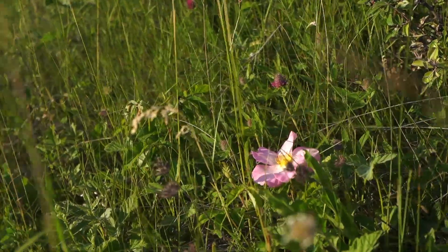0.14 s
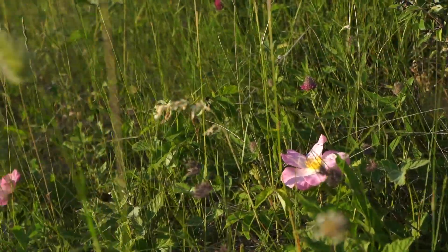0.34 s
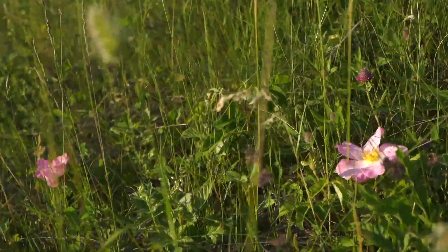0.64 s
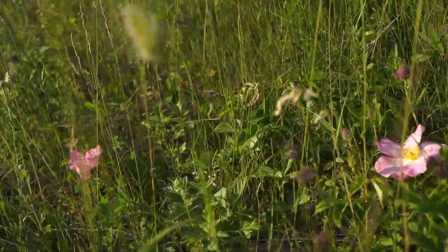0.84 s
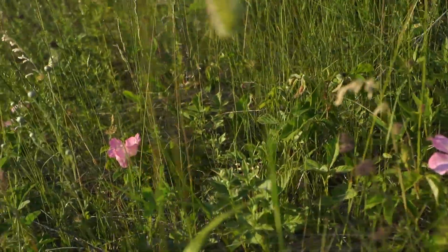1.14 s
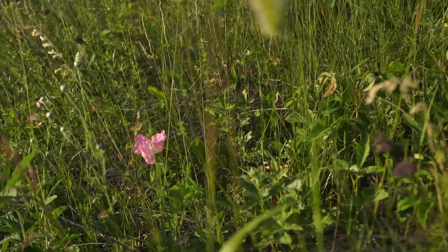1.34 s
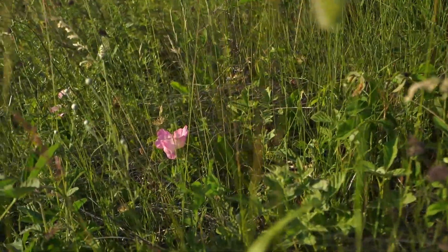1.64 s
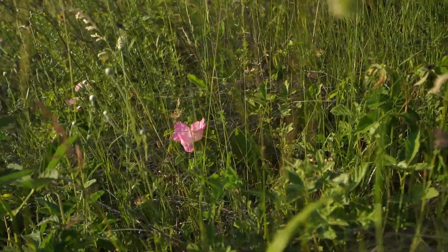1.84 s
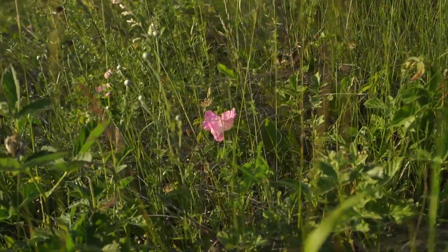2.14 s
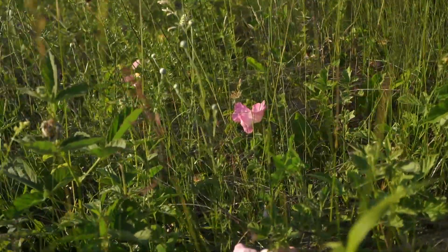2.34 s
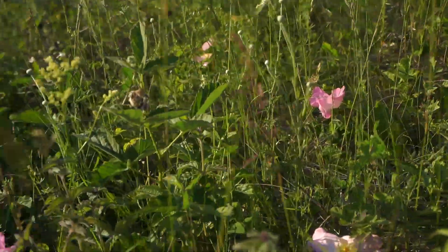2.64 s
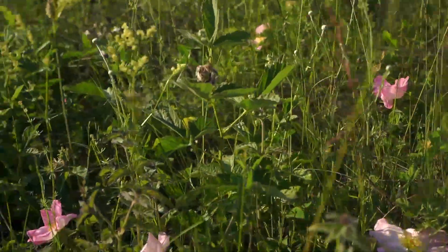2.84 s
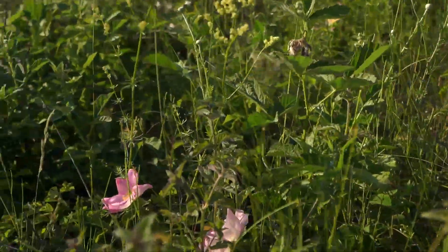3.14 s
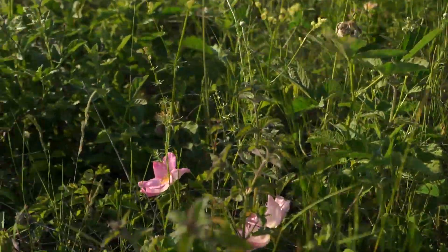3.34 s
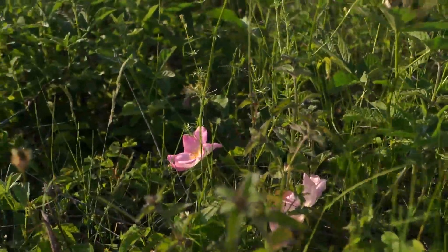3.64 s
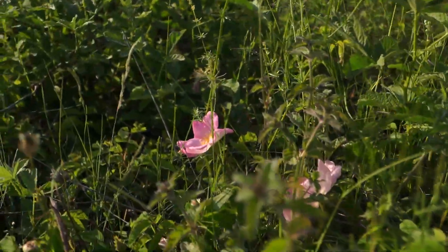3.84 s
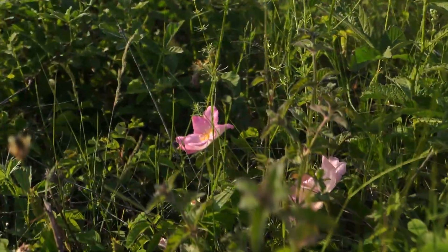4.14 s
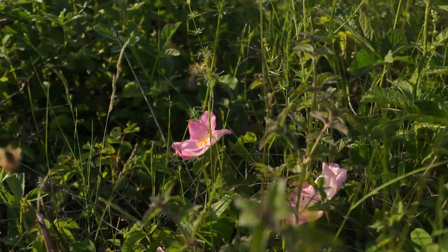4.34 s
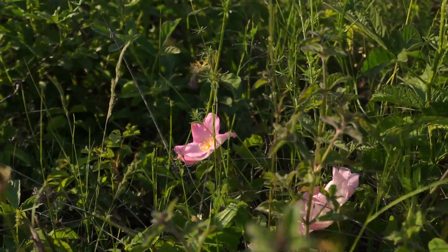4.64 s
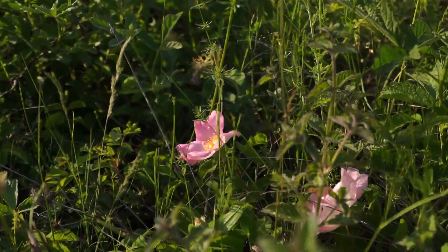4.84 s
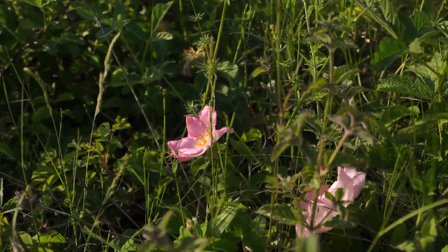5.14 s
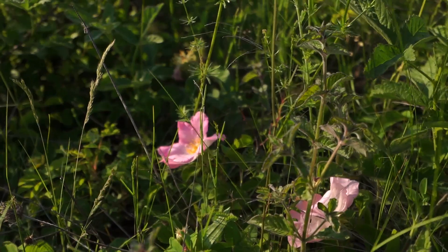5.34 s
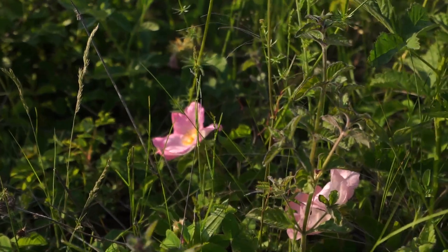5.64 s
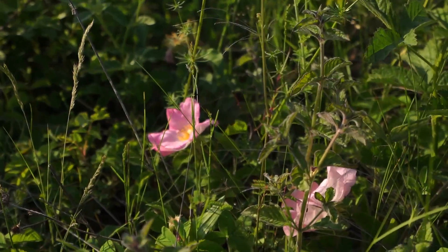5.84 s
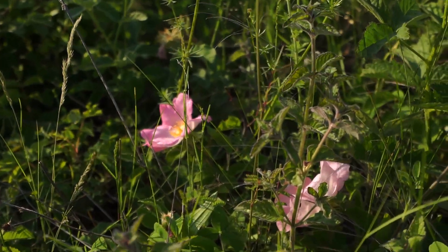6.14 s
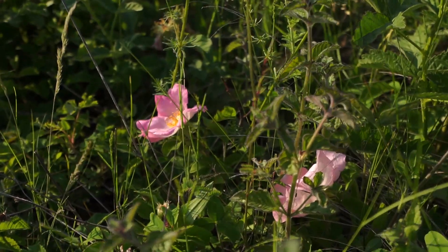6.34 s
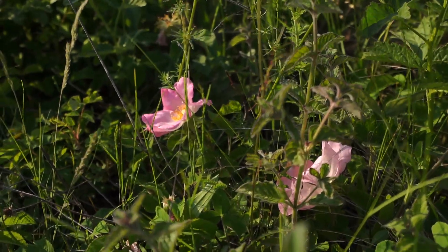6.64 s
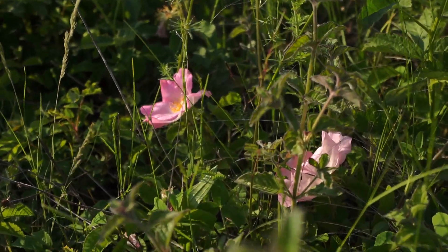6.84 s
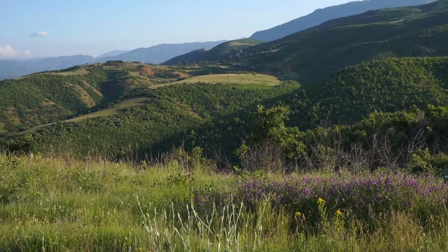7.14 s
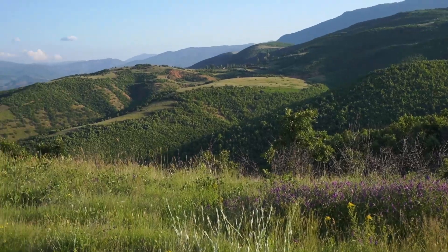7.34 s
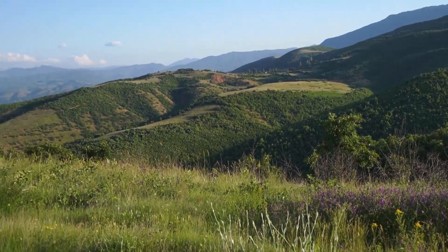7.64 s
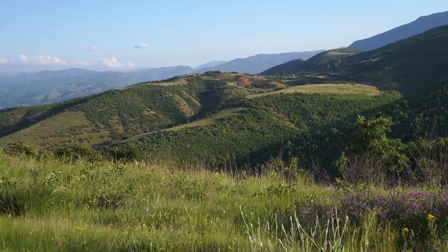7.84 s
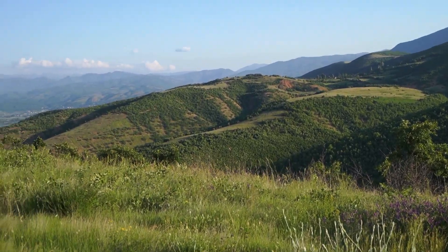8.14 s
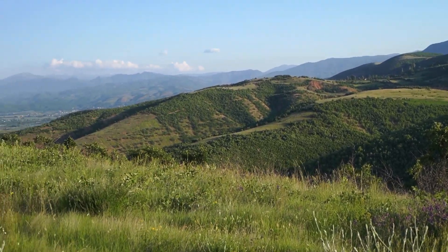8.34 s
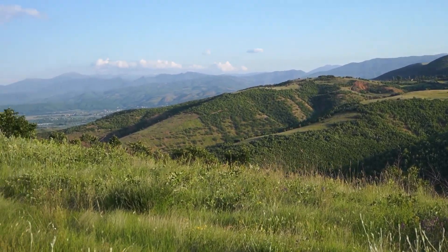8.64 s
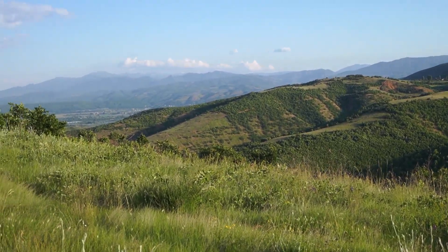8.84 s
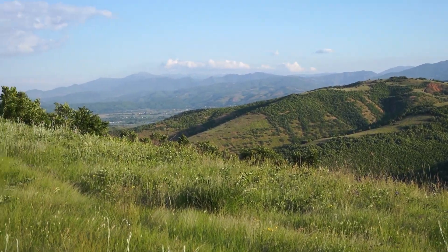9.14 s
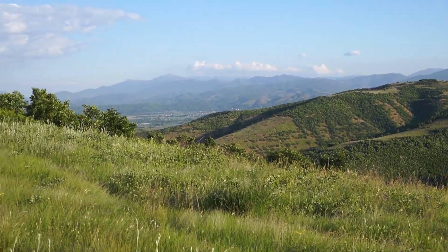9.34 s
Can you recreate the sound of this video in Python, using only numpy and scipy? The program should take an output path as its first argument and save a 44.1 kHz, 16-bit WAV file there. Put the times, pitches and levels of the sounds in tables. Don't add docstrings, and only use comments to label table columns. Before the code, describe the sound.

Several field crickets chirp in overlapping pulses over a faint distant chorus while gusts rumble on the microphone and a small bird sings near the end.

```python
import sys
import numpy as np
from scipy import signal
from scipy.fft import rfft, irfft
from scipy.io import wavfile
from scipy.ndimage import uniform_filter1d

SR = 44100
rng = np.random.default_rng(int(sys.argv[2]) if len(sys.argv) > 2 else 0)


def put_to_file(sound):
    columns = np.atleast_2d(sound).T
    safe = np.clip(columns, -1, 1)
    whole_steps = np.round(safe * 32767)
    wavfile.write(sys.argv[1], SR, whole_steps.astype(np.int16))


def convert_level_to_amplitude(level_db):
    exponent = np.asarray(level_db, float) / 20
    return 10 ** exponent


N = 418950

# f/Hz, level/dB, t60/s
HOUSING_MODES = [(141.4, 2.5, 0.13), (177.6, -13.5, 0.13), (250.7, -15.5, 0.11)]


def rms_one(x):
    return x / np.sqrt(np.mean(x ** 2) + 1e-20)


def drift(rate):
    r = np.exp(-80 * np.pi * rate / SR)
    white = rng.standard_normal(N // 40 + 2002)
    slow = signal.lfilter([1], [1, -2 * r, r * r], white)[2000:]
    return np.interp(np.arange(N) / 40, np.arange(len(slow)), rms_one(slow))


def shaped_noise(spectrum):
    hz, level_db = np.transpose(spectrum)
    grid = np.arange(N // 2 + 1) * SR / N + .01
    gain = convert_level_to_amplitude(np.interp(np.log(grid), np.log(hz), level_db))
    return rms_one(irfft(rfft(rng.standard_normal(N)) * gain, N))


def resonate(x, hz, width_hz):
    r = np.exp(-np.pi * width_hz / SR)
    poles = [1, -2 * r * np.cos(2 * np.pi * hz / SR), r * r]
    return signal.lfilter((1 - r * r) / 2 * np.array([1, 0, -1]), poles, x + 1e-18)


def narrow_noise(count, hz, width_hz):
    white = rng.standard_normal(count)
    return rms_one(resonate(resonate(white, hz, width_hz), hz, width_hz))


def ring(clicks, hz, t60):
    r, w = convert_level_to_amplitude(-60 / (t60 * SR)), 2 * np.pi * hz / SR
    return signal.lfilter([0, np.sin(w)], [1, -2 * r * np.cos(w), r * r], clicks + 1e-18)


def ring_modes(clicks, modes):
    return sum(convert_level_to_amplitude(db) * ring(clicks, hz, t60) for hz, db, t60 in modes)


def clicks_at(events):
    out = np.zeros(N)
    out[[round(s * SR) for s, db in events]] = convert_level_to_amplitude(np.array(events)[:, 1])
    return out


def add(out, start_s, sound):
    at = round(start_s * SR)
    out[at:at + len(sound)] += sound[:N - at]


def progress(start_s, end_s):
    return np.linspace(0, 1, round((end_s - start_s) * SR))


def bell(centre_s, half_s):
    return np.exp(-((np.arange(N) / SR - centre_s) / half_s) ** 2)


def tone(hz):
    return np.sin(2 * np.pi * np.cumsum(hz) / SR)


def grass_echo(x, t60):
    t = np.arange(round(t60 * SR)) / SR
    onset = np.minimum(t / .016, 1) ** 2
    tail = rng.standard_normal(len(t)) * convert_level_to_amplitude(-60 * t / t60) * onset
    return signal.fftconvolve(x, tail / np.sqrt(np.sum(tail ** 2)))[:N]


def gust_db():
    # t/s, level/dB, fall/(dB/s)
    gusts = [(.05, -19, 73), (.55, -32, 62), (.74, -33.5, 70), (2.91, -15.5, 47), (3.18, -17.5, 20),
             (3.41, -15.5, 103), (3.671, -10.5, 29), (4.1, -19, 60), (4.5, -23, 62), (4.72, -22, 32),
             (4.9, -18, 124), (5.06, -17, 200), (5.158, -12, 105), (5.34, -10, 110), (5.62, -20, 48),
             (5.95, -24, 24), (6.3, -23, 20), (6.5, -15.5, 250), (6.66, -16.5, 59), (7.14, -23.5, 130),
             (7.301, -14, 23), (7.48, -16, 37), (7.66, -18, 54), (7.94, -15.5, 25), (8.4, -19, 27),
             (8.71, -8, 108), (9.03, -12, 27), (9.16, -4.5, 78)]
    rise_db_per_s, lull_db = 111, -41
    t, level = np.arange(N) / SR, np.full(N, float(lull_db))
    for s, db, fall in gusts:
        level = np.maximum(level, db - np.where(t < s, rise_db_per_s * (s - t), fall * (t - s)))
    return level


def wind():
    # f/Hz, level/dB per Hz
    buffeting = [(2.9, -33), (5.0, -2), (16, 3.5), (30, -4.5), (89, -20), (227, -44.5), (262, -46.5),
                 (400, -58.5), (520, -80), (880, -120)]
    gust = gust_db()
    buffet = shaped_noise(buffeting) * convert_level_to_amplitude(gust + 1.83 * drift(12.7))
    shaken = sum(convert_level_to_amplitude(db) * ring(rng.standard_normal(N), hz, t60) for hz, db, t60 in HOUSING_MODES)
    hand_db, under_gust_db, follows_share = -47.5, -38.5, 0.63
    shaking = np.hypot(convert_level_to_amplitude(hand_db), convert_level_to_amplitude(under_gust_db + follows_share * gust))
    return 1.24 * np.tanh(buffet / 1.13) + rms_one(shaken) * shaking * convert_level_to_amplitude(2 * drift(9.4))


def air():
    # f/Hz, level/dB per Hz
    rustling = [(120, -36), (200, -5.5), (321, -9.5), (620, -5), (704, -9.5), (1110, -8.5), (1330, -11.5),
                (3440, -17.5), (4210, -17), (4870, -14), (6280, -20.5), (10100, -29), (15600, -34)]
    # t/s, half length/s, swell/dB
    brushing = (3.13, 0.84, 1.6)
    # t/s, half length/s, swell/dB
    far_swell = (6.62, 0.37, 3.2)
    # start t/s, end t/s, f/Hz, width/Hz, level/dB
    drone = (6.35, 6.9, 1680, 70, -65)
    # share of its f, level/dB
    buzz_bands = [(1, 3), (1.34, -8)]
    brush, swell = bell(*brushing[:2]), bell(*far_swell[:2])
    floor = convert_level_to_amplitude(-54 + brushing[2] * brush) * shaped_noise(rustling)
    low = signal.sosfilt(signal.butter(2, 2500, fs=SR, output="sos"), floor)
    crackles_per_s = 5.0 + 350 * brush
    born = rng.random(N) < crackles_per_s / SR
    crackle_db = -49.5 + 5.2 * np.minimum(rng.exponential(1, N), 4)
    crackle = resonate(born * convert_level_to_amplitude(crackle_db), 8500, 6000)
    out = convert_level_to_amplitude(far_swell[2] * swell) * low + floor - low + crackle
    start, end, hz, width, db = drone
    u = progress(start, end)
    for share, level_db in buzz_bands:
        band = rms_one(resonate(rng.standard_normal(len(u)), share * hz, width))
        add(out, start, convert_level_to_amplitude(db + level_db) * np.sin(np.pi * u) * band)
    return out


def chorus():
    # f/Hz, width/Hz, level/dB
    bands = [(4685, 160, -67), (5080, 300, -69)]
    return sum(convert_level_to_amplitude(db + 5.1 * drift(27) + drift(4.3)) * narrow_noise(N, hz, width) for hz, width, db in bands)


def strokes_of(chirps, opens):
    opener_lead_s, third_at_share, uneven_db = .030, .475, 1
    lifts_db = [-7, -0.4, 0, 0.4]
    uneven = uneven_db * rng.standard_normal((len(chirps), 4))
    strokes = []
    for (second, last, db), row in zip(chirps, uneven):
        times = [second - opener_lead_s, second, second + third_at_share * (last - second), last]
        chirp = [(s, db + lift_db + e) for s, lift_db, e in zip(times, lifts_db, row)]
        strokes += chirp if opens else chirp[1:]
    return strokes


def cricket(strokes, pitch_hz, lift, skip, second_db, third_db, click_db, echo_db):
    # share of f, length/s
    stroke_shapes = [(1.001, 0.0222), (.996, 0.01985), (.989, 0.0185), (.968, 0.0166)]
    out, scattered, left, later = np.zeros(N), np.zeros(N), 0, np.inf
    luck = rng.standard_normal((len(strokes), 3))
    for (s, db), (tune, stretch, wobble) in zip(strokes[::-1], luck):
        left = left + 1 if later - s < .055 else 0
        later = s
        share, length = stroke_shapes[min(left, 3)]
        u = progress(0, length * (1 - 3.5 * lift + 0.051 * stretch))
        since = u - skip * (1 + 0.22 * np.tanh(wobble))
        sag = 1 + lift * (since < 0) - 0.092 * u ** 3.01
        phase = 2 * np.pi * np.cumsum(pitch_hz * (share + 0.0033 * tune) * sag) / SR
        falter = 1 - 1.3 * skip * np.exp(-((since - .08) / 0.074) ** 2)
        body = np.sin(np.pi * u ** 0.94) ** 0.67 * falter * (1 + 0.04 * np.sin(14 * u + 2 * wobble))
        overtones = convert_level_to_amplitude(second_db) * np.sin(2 * phase) + convert_level_to_amplitude(third_db) * np.sin(3 * phase)
        hiss = np.diff(rng.standard_normal(len(u) + 1))
        burst = np.sin(1.13 * phase) + 0.32 * np.sin(2.4 * phase) + .05 * hiss
        click = convert_level_to_amplitude(click_db + 4.8 * stretch) * burst * np.exp(-(since / 0.051) ** 2)
        stroke = body * (np.sin(phase) + overtones) + click
        add(out, s - .001 - .008 * skip, convert_level_to_amplitude(db) * stroke)
        add(scattered, s, convert_level_to_amplitude(0.17 * (db + 44.5)) * stroke)
    return out + convert_level_to_amplitude(echo_db) * grass_echo(scattered, t60=0.17)


def crickets():
    # second stroke t/s, last stroke t/s, peak level/dB
    low = [(.191, .266, -38.5), (.556, .631, -40), (.859, .934, -38), (1.19, 1.266, -37),
           (1.51, 1.585, -38), (1.844, 1.919, -39.5), (2.148, 2.217, -40), (2.479, 2.556, -40),
           (2.788, 2.865, -41.5), (3.108, 3.187, -44), (3.45, 3.526, -45.5), (3.781, 3.858, -47),
           (4.115, 4.189, -45), (4.432, 4.508, -46), (4.819, 4.901, -44.5), (5.109, 5.183, -46.5),
           (5.432, 5.505, -42.5), (5.749, 5.822, -43.5), (6.077, 6.156, -44.5), (6.406, 6.479, -45),
           (6.723, 6.802, -45.5), (7.035, 7.108, -45), (7.313, 7.388, -35.5), (7.634, 7.707, -37),
           (7.961, 8.038, -40), (8.271, 8.351, -42), (8.591, 8.668, -43), (8.908, 8.981, -41.5),
           (9.216, 9.291, -43)]
    clear = [(0.331, 0.404, -36.5), (0.68, 0.756, -37), (1.071, 1.146, -36.5), (1.446, 1.515, -37),
             (1.802, 1.877, -36), (2.161, 2.237, -35.5), (2.508, 2.579, -39), (2.86, 2.936, -40.5),
             (3.259, 3.33, -42), (3.59, 3.665, -40.5), (3.945, 4.022, -39), (4.314, 4.389, -39),
             (4.676, 4.745, -42.5), (5.054, 5.125, -39.5), (5.407, 5.479, -41), (5.796, 5.87, -40),
             (6.204, 6.278, -41), (6.621, 6.698, -41.5), (6.987, 7.066, -39.5), (7.076, 7.153, -38),
             (7.493, 7.564, -36.5), (7.849, 7.913, -42.5), (8.185, 8.25, -46.5), (9.319, 9.389, -44)]
    sharp_start = [(.158, .225, -46), (.455, .52, -45.5), (.745, .812, -47.5), (.999, 1.062, -44.5)]
    sharp = [(1.566, 1.639, -45), (1.964, 2.034, -43.5), (2.307, 2.372, -45), (2.644, 2.714, -46.5),
             (2.976, 3.041, -46.5), (3.289, 3.356, -44), (3.598, 3.664, -43.5), (3.899, 3.968, -48.5),
             (4.213, 4.282, -44), (4.522, 4.588, -46), (4.812, 4.883, -48), (5.211, 5.279, -46.5),
             (5.493, 5.556, -46.5), (5.782, 5.849, -46), (6.061, 6.131, -47.5), (6.356, 6.421, -46.5),
             (6.673, 6.74, -48.5), (6.986, 7.047, -45.5), (7.343, 7.408, -44)]
    near = [(7.256, 7.321, -34), (7.587, 7.657, -33), (7.954, 8.021, -30.5), (8.292, 8.36, -29.5),
            (8.633, 8.699, -30), (8.938, 9.003, -31), (9.277, 9.344, -30.5)]
    far = [(8.40, 8.47, -56), (8.496, 8.561, -48), (8.705, 8.77, -53), (8.805, 8.877, -51),
           (9.05, 9.122, -58), (9.123, 9.193, -51), (9.345, 9.411, -45.5)]
    twin = [(0.196, .268, -42), (0.484, .562, -40.5), (0.803, .874, -47), (1.12, 1.186, -50),
            (7.67, 7.739, -52)]
    voices = [
        (4773, .0, 0, -31, -53, -27, -48),
        (5100, 0.00071, .0, -29.5, -59, -30, -50),
        (5244, 0.046, 0.35, -14, -39, -5.5, -55.5),
        (5158, 0.0041, 0.0061, -18, -38, -15, -50.5),
        (4700, 0.0069, 0.0052, -40, -53, -30, -64),
        (5050, 0.018, .0, -27, -55, -30, -68),
    ]
    singers = [strokes_of(low, True), strokes_of(clear, True),
               strokes_of(sharp_start, False) + strokes_of(sharp, True),
               strokes_of(near, True), strokes_of(far, True), strokes_of(twin, False)]
    return sum(cricket(strokes, *voice) for strokes, voice in zip(singers, voices))


def stems():
    # t/s, level/dB
    ticks = [(0.249, -42.5), (0.4306, -41), (0.6978, -48), (0.841, -38.5), (1.4357, -36.5), (2.2338, -44.5),
             (4.6668, -45), (4.7045, -42), (4.997, -42), (5.9438, -42), (9.1742, -42)]
    # t/s, level/dB
    snaps = [(1.4346, -53), (1.6955, -55), (2.4394, -49), (2.8185, -47.5), (3.1862, -47), (3.2161, -50),
             (3.2879, -49), (3.3139, -49), (3.5623, -52), (3.5917, -52), (3.7309, -52), (5.5877, -43),
             (5.9429, -58), (7.4111, -56)]
    # t/s, level/dB
    thick_stem = [
        (5.589, -33),
    ]
    # f/Hz, level/dB, t60/s
    thick_modes = [(755, 2.5, 0.021), (1330, 0.5, 0.017), (2300, -3, 0.0045), (3300, 0, 0.0032)]
    dull_modes = [(760, -3, 0.011), (1720, 7, 0.0065), (3160, 2, 0.0035)]
    bright_modes = [(7340, 3.5, 0.0057), (8560, 2, 0.0065), (12000, -12, .003)]
    dull = ring_modes(clicks_at(ticks), dull_modes)
    bright = ring_modes(clicks_at(snaps), bright_modes)
    return dull + bright + ring_modes(clicks_at(thick_stem), thick_modes)


def bumps():
    # t/s, peak level/dB
    knocks = [
        (0.612, -27),
        (2.418, -28),
        (2.595, -23),
        (2.615, -7.5),
        (2.792, -11),
        (7.218, -26.5),
    ]
    clicks = clicks_at(knocks)
    soft = -signal.lfilter(np.hanning(140) / 70, 1, clicks)
    return convert_level_to_amplitude(-1.0) * ring_modes(soft, HOUSING_MODES) + convert_level_to_amplitude(-9.0) * ring(clicks ** 3, 720, 0.016)


def rubs():
    # t/s, level/dB
    grip_shifts = [(2.35, -54), (4.53, -52), (5.14, -50.5), (6.03, -50.5), (6.16, -52), (6.4, -50),
                   (6.47, -49), (6.71, -49), (7.24, -49)]
    # half length/s, f/Hz, width/Hz
    rub_band = (.035, 250, 88)
    half_s, hz, width = rub_band
    return narrow_noise(N, hz, width) * sum(convert_level_to_amplitude(db) * bell(s, half_s) for s, db in grip_shifts)


def hoarse(hz):
    tremble = uniform_filter1d(rng.standard_normal(len(hz)), size=60) * np.sqrt(60)
    return tone(hz * (1 + 0.016 * tremble))


def whistles():
    # start t/s, end t/s, start f/Hz, end f/Hz, level/dB
    glides = [(7.89, 7.94, 1830, 1950, -59), (7.922, 7.96, 4300, 4050, -44),
              (8.007, 8.10, 2000, 1940, -58.5), (8.112, 8.18, 1860, 2760, -49.5),
              (8.157, 8.195, 2800, 2450, -45.5), (8.405, 8.477, 1990, 1830, -56.5),
              (8.48, 8.50, 1680, 1570, -53), (8.613, 8.652, 2650, 3800, -40),
              (8.636, 8.663, 3760, 2620, -36.5), (8.744, 8.76, 2300, 1880, -48),
              (8.765, 8.79, 2820, 2500, -48.5), (9.05, 9.08, 2550, 2450, -61),
              (9.265, 9.3, 2770, 2600, -58)]
    # t/s, level/dB
    flicks = [(3.042, -45), (5.563, -55), (7.335, -46), (8.735, -49)]
    # length/s, start f/Hz, end f/Hz
    flick_shape = (0.017, 5550, 5880)
    # start t/s, end t/s, edge f/Hz, top f/Hz, level/dB
    arches = [
        (7.197, 7.245, 1870, 2500, -53.5),
        (7.265, 7.308, 3870, 4070, -58),
        (8.728, 8.74, 2150, 2260, -54),
    ]
    out = np.zeros(N)
    flick_glides = [(s, s + flick_shape[0], *flick_shape[1:], db) for s, db in flicks]
    for start, end, hz0, hz1, db in glides + flick_glides:
        u = progress(start, end)
        add(out, start, convert_level_to_amplitude(db) * np.sin(np.pi * u) ** 0.56 * hoarse(hz0 + (hz1 - hz0) * u ** 1.1))
    for start, end, edge_hz, top_hz, db in arches:
        u = progress(start, end)
        hz = edge_hz + (top_hz - edge_hz) * np.sin(np.pi * u)
        add(out, start, convert_level_to_amplitude(db) * np.sin(np.pi * u) ** 0.54 * hoarse(hz))
    return out


def warbles():
    # start t/s, end t/s, f/Hz, shake rate/Hz, level/dB
    steady = [(7.43, 7.52, 3900, 140, -55), (7.725, 7.844, 4000, 110, -44), (8.214, 8.272, 4150, 150, -42),
              (8.545, 8.602, 4200, 200, -41)]
    falling = (7.95, 8.053, 3700, 118, -38)
    out = np.zeros(N)
    for start, end, hz, rate, db, fall_share in [(*row, 0) for row in steady] + [(*falling, .065)]:
        u, depth = progress(start, end), min(.0007 * rate, .14)
        shake = 2 * np.pi * rate * u * (end - start) + .5 * np.sin(9 * u)
        louder_falling = 1 - 3 * depth * np.cos(shake)
        pitch = hz * (1 - fall_share * u) * (1 + depth * np.sin(shake))
        add(out, start, convert_level_to_amplitude(db) * louder_falling * np.sin(np.pi * u ** 2) ** .5 * hoarse(pitch))
    return out


def trill():
    # f/Hz, length/s, after-tick f/Hz, level/dB
    trill_note = (2925, .0142, 2620, -40)
    out = np.zeros(N)
    hz, length, tick_hz, db = trill_note
    for k in range(6):
        start, u = 8.288 + .0186 * k + .00036 * k * k, progress(0, length)
        add(out, start, convert_level_to_amplitude(db) * np.sin(np.pi * u) ** 0.1 * hoarse(hz * (1.004 - 0.012 * u)))
        add(out, start + length, convert_level_to_amplitude(db - 5) * np.hanning(200) * tone(np.full(200, tick_hz)))
    return out


def rattle():
    rattle_call = (8.796, 9.033, 2880, 61.0, -44)
    out = np.zeros(N)
    start, end, hz, rate, db = rattle_call
    u = progress(start, end)
    within = rate * u * (end - start) % 1
    tail = (1 - .8 * u) * np.exp(-((within - .55) / .19) ** 2)
    pulse = np.exp(-((within - .12) / .12) ** 2) + tail
    pitch = hz * (1 + .03 * np.cos(2 * np.pi * within))
    add(out, start, convert_level_to_amplitude(db - 6 * u) * pulse * hoarse(pitch))
    return out


def bird():
    song = whistles() + warbles() + trill() + rattle()
    return song + convert_level_to_amplitude(-19) * grass_echo(song, t60=.25)


def scene():
    return (wind() + air() + chorus() + crickets() + stems() + bumps() + rubs() + bird())[None]


def top_cut(x):
    return signal.sosfilt(signal.butter(12, 15790, fs=SR, output="sos"), x)


def record(dry):
    mix = np.clip(dry, -.99, .99)
    return top_cut(mix)


dry = scene()
out = record(dry)
put_to_file(out)
```